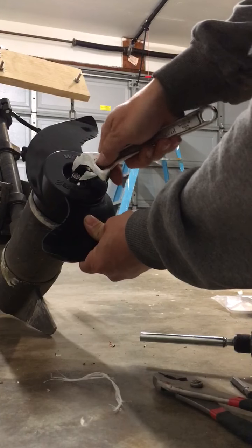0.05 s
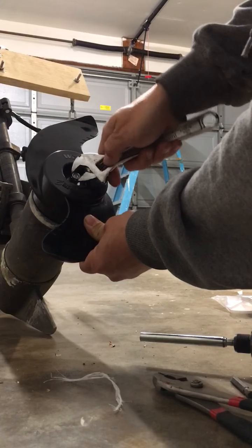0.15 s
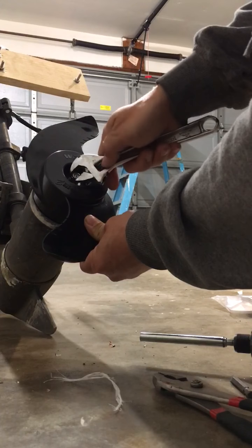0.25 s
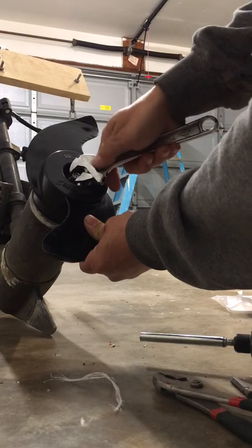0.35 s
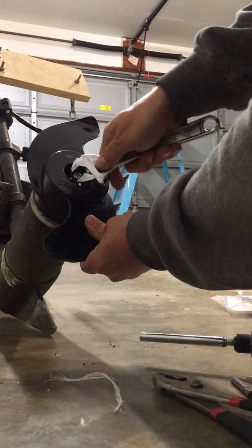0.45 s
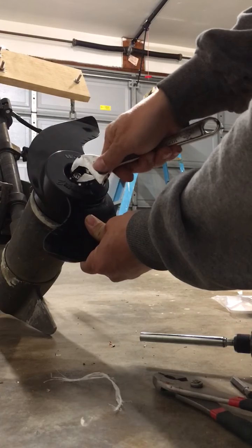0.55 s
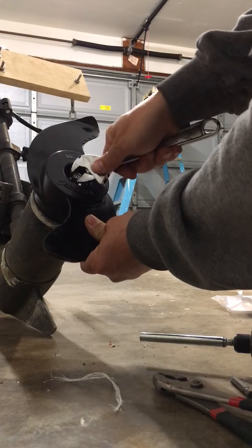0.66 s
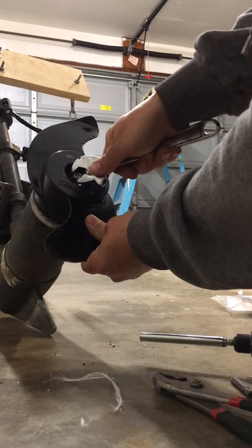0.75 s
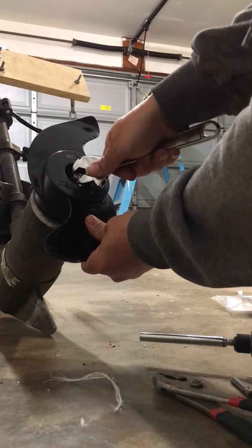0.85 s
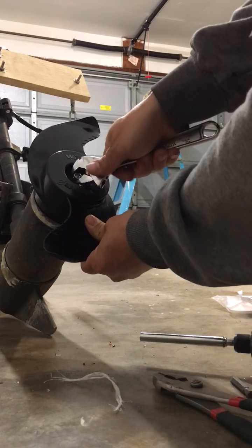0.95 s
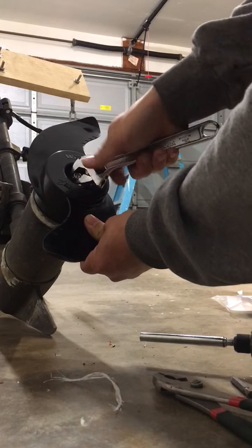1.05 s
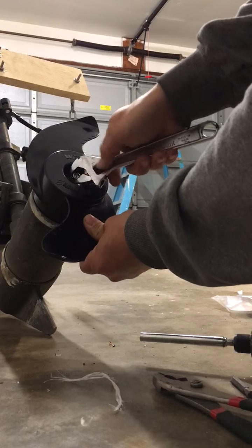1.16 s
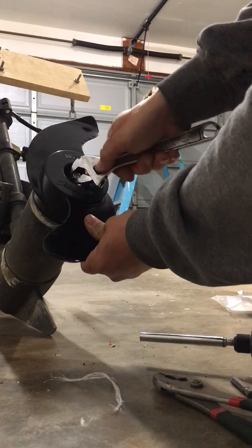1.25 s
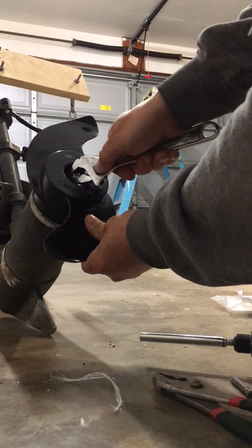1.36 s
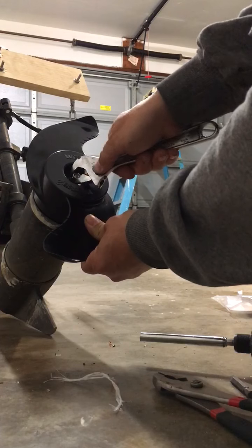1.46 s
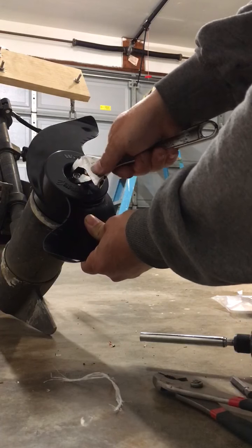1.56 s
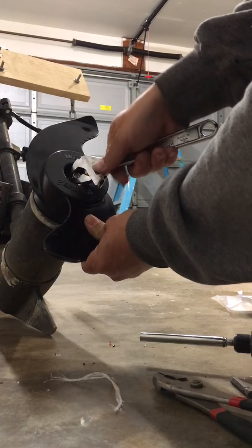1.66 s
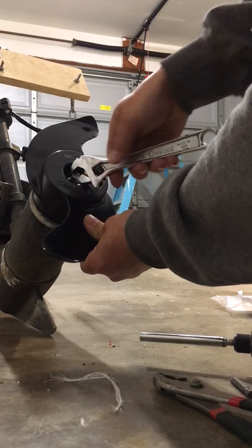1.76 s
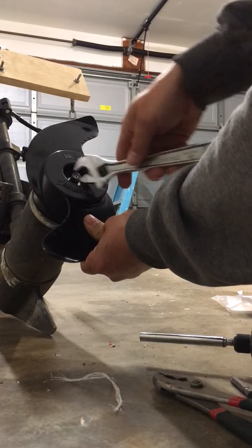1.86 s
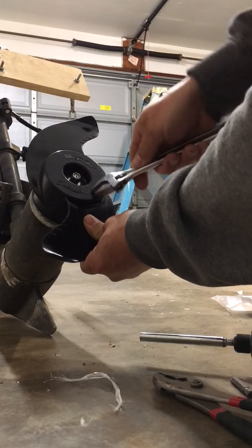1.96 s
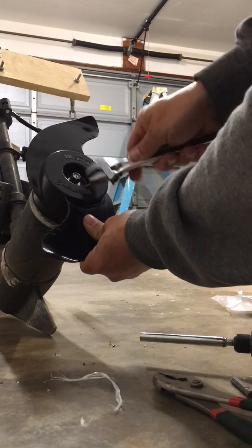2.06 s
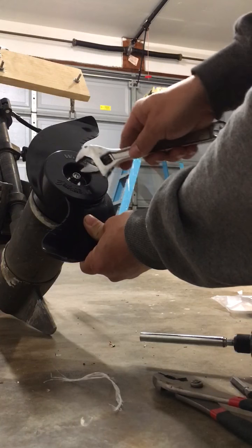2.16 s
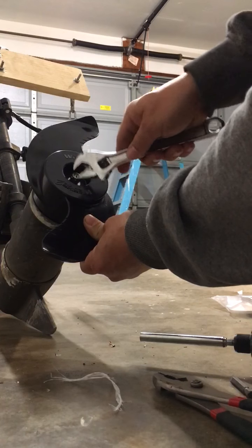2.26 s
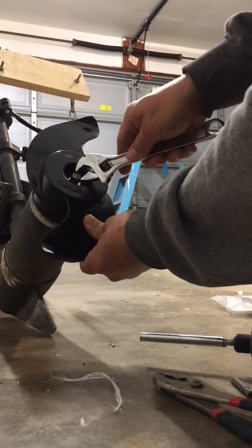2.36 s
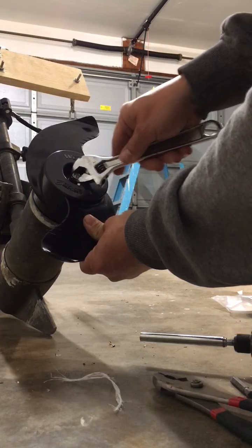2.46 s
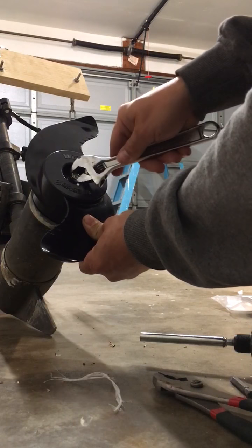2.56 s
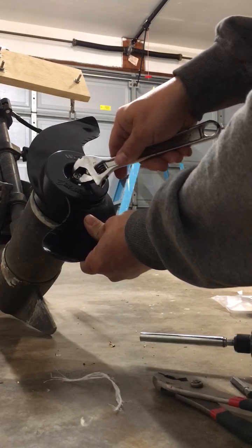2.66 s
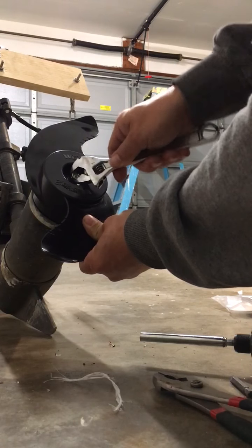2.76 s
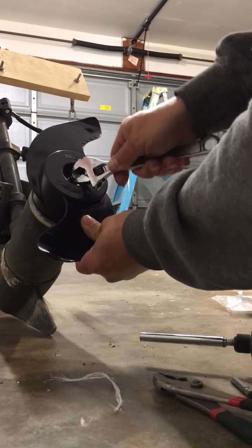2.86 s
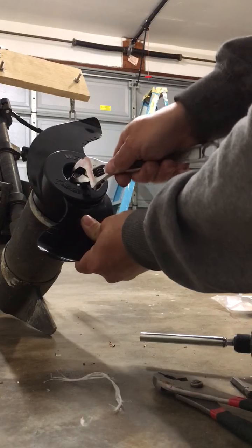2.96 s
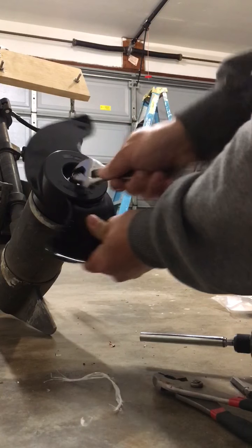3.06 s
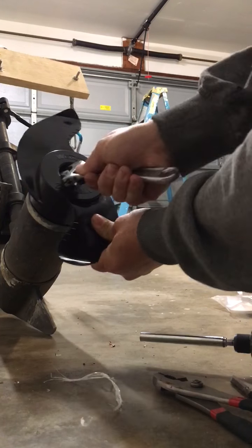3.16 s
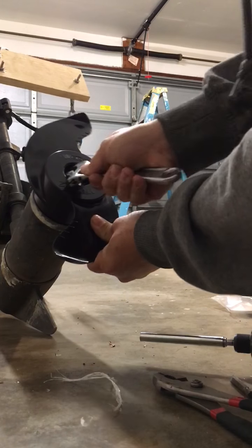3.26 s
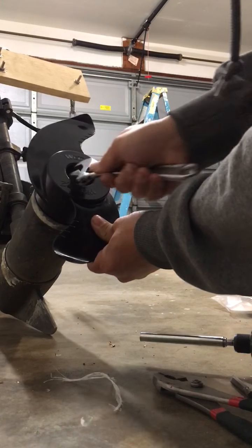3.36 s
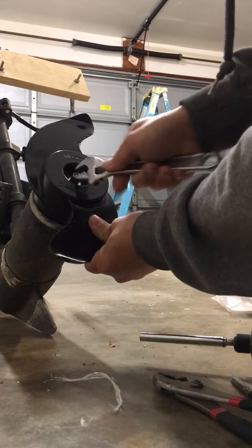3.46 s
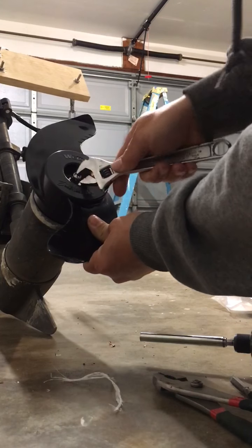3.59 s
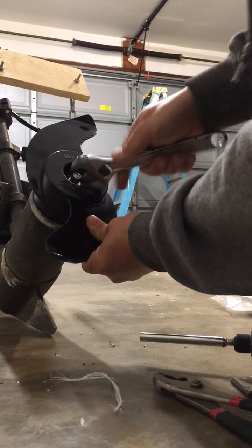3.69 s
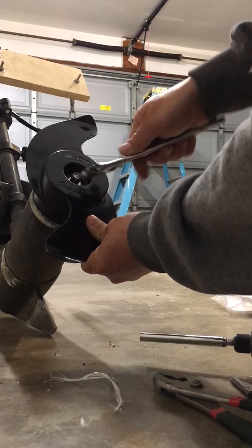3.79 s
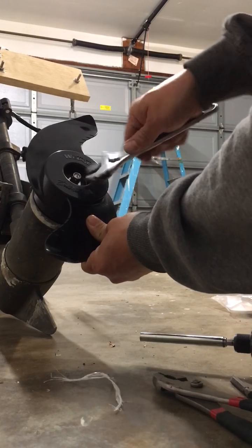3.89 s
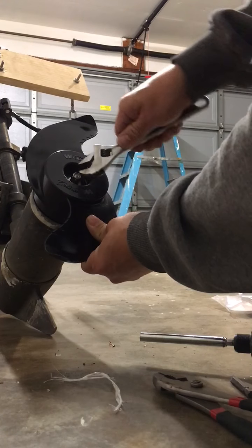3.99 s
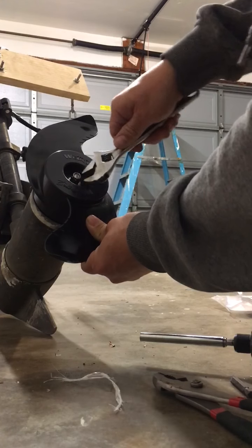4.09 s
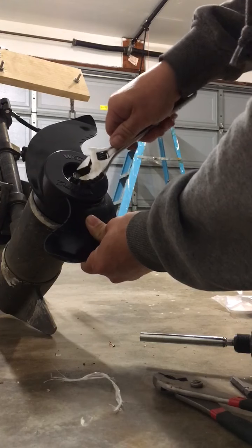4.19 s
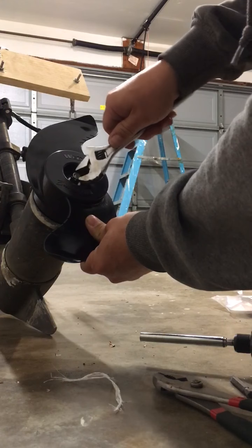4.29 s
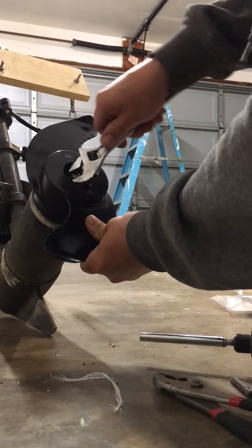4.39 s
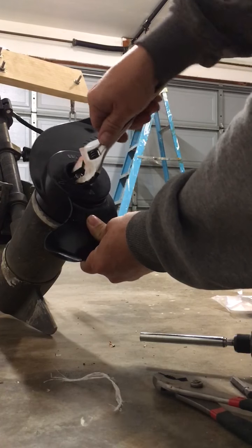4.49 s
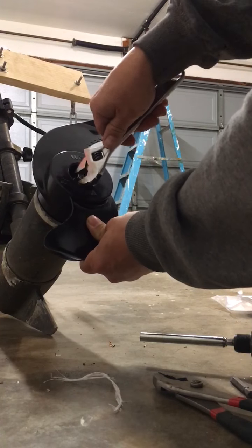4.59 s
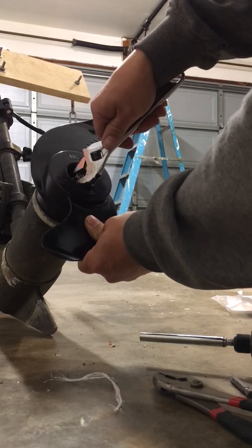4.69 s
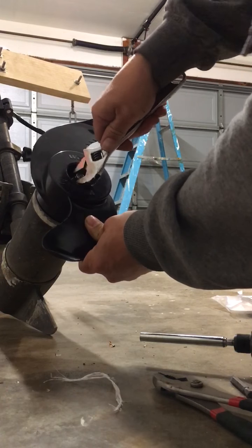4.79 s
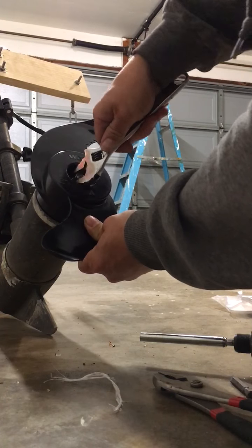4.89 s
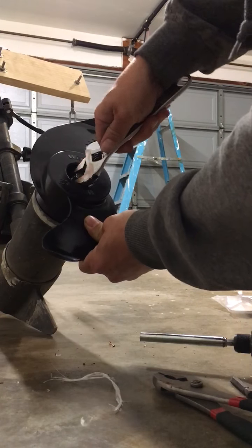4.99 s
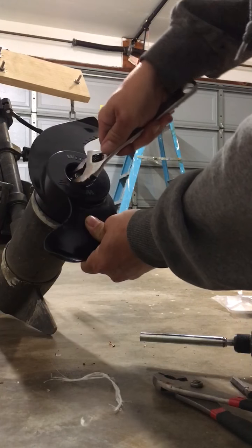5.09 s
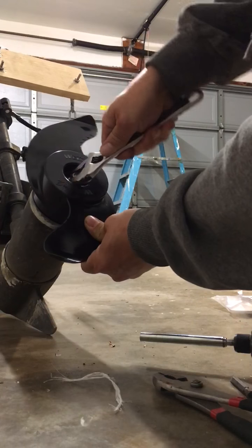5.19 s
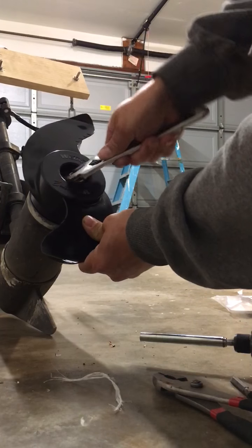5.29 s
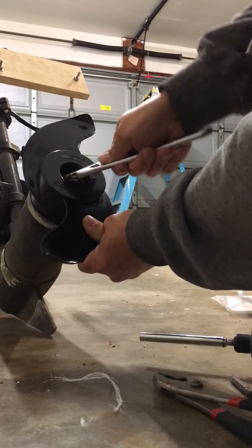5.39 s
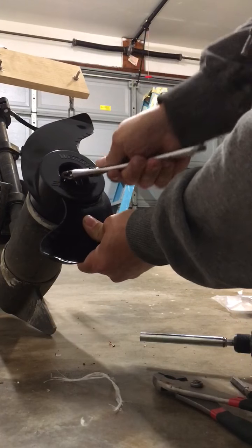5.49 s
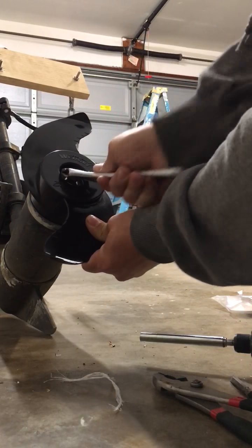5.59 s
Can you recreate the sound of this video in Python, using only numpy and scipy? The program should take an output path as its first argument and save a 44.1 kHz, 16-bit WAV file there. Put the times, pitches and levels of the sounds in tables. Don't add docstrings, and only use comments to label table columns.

```python
import sys
import numpy as np
from scipy import signal
from scipy.fft import rfft, irfft, next_fast_len
from scipy.io import wavfile
from scipy.ndimage import uniform_filter1d

SR = 44100
rng = np.random.default_rng(int(sys.argv[2]) if len(sys.argv) > 2 else 0)


def gain_from_decibels(decibels):
    exponent = np.asarray(decibels, float) / 20
    return 10 ** exponent


def bounce(signal):
    frames = np.transpose(np.atleast_2d(signal))
    limited = np.clip(frames, -1, 1)
    pcm = np.round(limited * 32767).astype(np.int16)
    wavfile.write(sys.argv[1], SR, pcm)


N = 248677


def evened(x):
    return x / np.sqrt(np.mean(x ** 2) + 1e-20)


def read(points, hz):
    f, value = np.transpose(points)
    return np.interp(np.log(hz + 1), np.log(f + 1), value)


def add(mix, s, sound):
    part = mix[round(s * SR):][:len(sound)]
    part += sound[:len(part)]


def coloured(x, points):
    size = next_fast_len(len(x))
    gain = gain_from_decibels(read(points, np.fft.rfftfreq(size, 1 / SR)))
    return irfft(rfft(x, size) * gain, size)[:len(x)]


def resonate(x, hz, width):
    r = np.exp(-np.pi * width / SR)
    pole = r * np.exp(2j * np.pi * hz / SR)
    return 2 * signal.lfilter([1 - r], [1, -pole], x).real


def resonances(push, modes):
    return evened(sum(gain_from_decibels(db) * evened(resonate(resonate(push, hz, width), hz, width))
                      for hz, width, db in modes))


def contact(chance, ms):
    u = np.arange(len(chance)) / SR / (ms / 1000)
    return chance * np.minimum(u * 8, 1) * np.exp(-u ** 2.1)


def struck(force, db, modes):
    t = np.arange(round(max(m[2] for m in modes) * SR)) / SR
    body = np.zeros(len(t))
    for hz, level, t60 in modes:
        build_up = 1 - np.exp(-2.5 * hz * t)
        body += gain_from_decibels(level - 60 * t / t60) * np.sin(2 * np.pi * hz * t) * build_up
    sound = signal.fftconvolve(force, body)
    return gain_from_decibels(db) * sound / abs(sound).max()


def hum():
    # frequency in Hz, level in dB per Hz.
    air_spectrum = [(30, -26.5), (60, -9.5), (100, -6), (200, -11), (320, -17.5), (600, -23), (1250, -31.5),
                    (1800, -45), (3500, -41.5), (4900, -49), (6000, -48.5), (10500, -59.5), (12000, -54.5),
                    (16000, -59.5)]
    # frequency in Hz, level in dB rms, waver in dB.
    motor_lines = [(57.8, -48, 0.1), (120, -46, -0.46), (240, -56, 1.5)]
    # frequency in Hz, width in Hz, level in dB.
    air_modes = [(172.3, 11, -59), (397.3, 22, -60.5), (562, 25, -67.5), (692, 22, -64.5), (980, 190, -67),
                 (1487, 61, -70), (2222, 390, -75)]
    t = np.arange(N) / SR
    out = gain_from_decibels(-54) * evened(coloured(rng.standard_normal(N), air_spectrum))
    for hz, db, waver_db in motor_lines:
        drift = evened(resonate(rng.standard_normal(N), 0, 3.2))
        phase = 2 * np.pi * (hz * t + rng.random()) + .06 * drift
        out += np.sqrt(2) * gain_from_decibels(db + waver_db * drift) * np.sin(phase)
    for hz, width, db in air_modes:
        out += gain_from_decibels(db) * evened(resonate(rng.standard_normal(N), hz, width))
    return out


def garage(blows, held):
    # frequency in Hz, t60 in seconds.
    room_decay = [(250, .5), (700, 0.66), (1700, 0.91), (4600, 0.79), (11000, 0.51), (16000, 0.48)]
    # frequency in Hz, level in dB.
    tail_spectrum = [(250, -12), (800, -9), (2000, -7.5), (5000, -12.5), (9000, -14), (14000, -19.5)]
    hz, t, z = signal.stft(rng.standard_normal((3, SR)), SR, nperseg=256)
    decay = gain_from_decibels(-60 * t / read(room_decay, hz)[:, None])
    tails = signal.istft(z * decay, SR, nperseg=256)[1]
    age = np.arange(tails.shape[1]) / SR
    tails *= np.clip(age / 0.0014, 0, 1)
    tails *= gain_from_decibels(2.5 * np.exp(-age / .025))

    def turns(rate):
        cycle = np.arange(N) / SR * rate + np.arange(3)[:, None] / 3
        return np.cos(np.pi * cycle) * np.sqrt(2 / 3)

    sent = blows * turns(310) + held * turns(7)
    wet = signal.fftconvolve(sent, tails / np.linalg.norm(tails[0]), axes=1)[:, :N].sum(0)
    return coloured(wet, tail_spectrum)


def shake():
    # peak time in seconds, level in dB, t60 in seconds.
    jolts = [(1.122, -45, 0.21), (1.17, -52.5, .6), (2.026, -34.5, .7), (2.292, -38, 0.72),
             (2.394, -33.5, 0.44), (2.63, -55.5, 0.39), (3.165, -36, .4), (3.222, -31, 0.24),
             (3.305, -38, 1.5), (3.612, -47, 0.13), (3.768, -47.5, 0.16), (4.22, -41.5, 0.604),
             (4.316, -41, 0.32), (4.464, -72, 0.17), (4.52, -49, 1.43)]
    # frequency in Hz, width in Hz, level in dB.
    tube_modes = [(80.5, 140, -0.5), (135.2, 32, -2.5), (203.5, 37, -6.5), (279.7, 20, -13.5)]
    rise_s = 0.033
    push, t = rng.standard_normal(N), np.arange(N) / SR
    sway = np.zeros(N)
    for s, db, t60 in jolts:
        rise = np.clip(1 + (t - s) / rise_s, 0, 1)
        sway += gain_from_decibels(db - 60 * np.clip(t - s, 0, 2) / t60) * rise
    return sway * resonances(push, tube_modes)


def thuds():
    # start in seconds, level in dB, pitch in Hz, t60 in seconds.
    rocks = [
        (2.04, -45, 85, .25),
        (3.195, -38, 72, .15),
        (3.245, -35, 85, .12),
        (3.335, -37, 80, .15),
    ]
    out = np.zeros(N)
    for s, db, hz, t60 in rocks:
        add(out, s, struck(contact(np.ones(1024), 5), db, [(hz, 0, t60)]))
    return out


def scrape():
    # start in seconds, length in seconds, first level in dB,
    # last level in dB, hub over steel in dB.
    strokes = [(0, 0.13, -72.5, -78, 8), (1.802, 0.075, -67.5, -75, 9), (3.041, 0.12, -77.5, -55, 3),
               (3.151, 0.029, -56, -58, 4), (3.173, 0.015, -55.5, -39, 3), (3.183, 0.022, -37.5, -32, -6),
               (3.96, 0.063, -70, -71, -1), (4.07, 0.079, -72, -82.5, 3), (4.232, .06, -62, -59, 6),
               (2.288, .045, -60, -66, 4), (4.358, 0.076, -65, -67, 8.5), (4.431, 0.061, -69, -57.5, 11)]
    glides = [
        (1.9, 0.07, -81, -62.5, 12.4),
        (4.51, 0.19, -60, -82, 4),
        (5.28, 0.196, -77.5, -74, 8.2),
        (5.47, 0.21, -71, -70, 6.8),
    ]
    # frequency in Hz, width in Hz, level in dB.
    rubbed_parts = [
        [(3650, 1000, -3), (2500, 1500, -5)],
        [(5870, 1200, 6), (6360, 950, 0)],
        [(9440, 900, -3), (11600, 1500, -2.5), (8000, 5000, 0), (14500, 5000, -5.5)],
        [(840, 510, 3), (1580, 140, -2)],
    ]
    handle_db, edge_s = -7, 0.007
    out, press = np.zeros(N), np.zeros((4, N))
    for rows, nut_db in ((strokes, -3), (glides, 0)):
        for s, length, first_db, last_db, hub_db in rows:
            t = np.arange(0, length, 1 / SR)
            edges = np.clip(np.minimum(t, length - t) / edge_s, 0, 1)
            stroke = gain_from_decibels(first_db + (last_db - first_db) * t / length) * edges
            for part, db in zip(press, (0, nut_db, handle_db, hub_db)):
                add(part, s, gain_from_decibels(db) * stroke)
    grip = evened(uniform_filter1d(rng.standard_normal(N), size=260))
    for gain, modes in zip(press, rubbed_parts):
        unevenness_db = 2.5 * rng.standard_normal(N) + 2.5 * grip
        slips = rng.standard_normal(N) * gain_from_decibels(unevenness_db)
        out += gain * resonances(slips, modes)
    return out


def shaft():
    # frequency in Hz, level in dB, share of the t60.
    close_modes = [(1434, -6, .9), (1472, -3, 1.1), (1533, -2, 1.0), (1551, -6, 1.1), (1577, 0, 1.0),
                   (1645, -8, 0.8)]
    # start in seconds, level in dB, t60 in seconds.
    shaft_blows = [
        (2.3683, -28, 0.2),
        (2.4222, -35, 0.22),
        (3.2069, -25, .6),
        (3.2199, -29, 0.9),
        (4.295, -42, 0.1),
    ]
    out, chance = np.zeros(N), rng.standard_normal((len(shaft_blows), 128))
    for (s, db, t60), c in zip(shaft_blows, chance):
        modes = [(hz, level + 2.5 * k, t60 * share)
                 for (hz, level, share), k in zip(close_modes, c[::-1])]
        add(out, s, struck(contact(c, 0.39), db, modes))
    return out


def rings():
    # frequency in Hz, t60 in seconds.
    handle_modes = [(3311, 0.096), (5884, .3), (8950, 0.42), (11860, 0.3)]
    # start in seconds, then the levels in dB of its four modes from low to high.
    pings = [(.1037, -72, -82, -89, -74), (0.4207, -58, -61, -61.5, -68), (.6838, -69, -73, -92, -66),
             (.7886, -79, -90, -88, -70), (1.6034, -68.5, -72, -82, -87), (1.813, -64.5, -67, -77, -87),
             (2.831, -52.5, -58, -55, -53), (3.0355, -62, -68, -73.5, -74.5), (3.228, -52, -52, -55, -53),
             (3.411, -58.5, -60, -60, -68.5), (3.489, -52, -56, -73.5, -55), (3.5365, -67, -79, -79, -52.5),
             (3.9413, -55, -56, -58, -57), (4.3094, -52, -55, -74, -59), (4.722, -68, -76.5, -73, -72),
             (5.1103, -72, -89.5, -86.5, -72)]
    # start in seconds, level in dB, pitch
    # in Hz, t60 in seconds; the clear notes below have the same columns.
    ringing_parts = [(.001, -60, 5600, 0.31), (4.297, -44, 5550, 0.32), (0.853, -50, 810, .12),
                     (1.3119, -50, 2590, 0.025), (1.3151, -50, 1340, 0.13), (1.8131, -72.5, 11400, 0.092),
                     (2.0125, -15, 15800, .008), (2.0132, -24, 8510, .009), (2.3348, -20.5, 11500, .006),
                     (2.3685, -30, 15500, .008), (2.4205, -32, 15100, .005), (2.015, -28, 6050, 0.3),
                     (2.37, -27.5, 8420, .08), (2.3695, -28, 11600, .012), (2.371, -32, 5630, .1),
                     (2.352, -36, 5650, .04), (2.4245, -26, 8500, .015), (2.4248, -32, 9500, .01),
                     (2.43, -43, 5580, .5), (2.4242, -39, 5860, 0.58), (2.427, -40, 8500, 0.4),
                     (3.215, -41, 1950, 0.7), (3.23, -44, 2600, .8), (3.394, -56, 6400, .02),
                     (3.853, -45, 3795, 0.033), (5.56, -60, 3350, 0.21), (0.3143, -52, 4600, 0.0091),
                     (1.31, -53, 4600, .01), (3.228, -45, 11880, 0.37), (3.4885, -50.5, 8000, .01),
                     (3.528, -58, 14000, .006), (3.6007, -14.5, 14700, .01), (3.6009, -24, 9800, .012),
                     (3.6036, -27, 9800, .02), (3.601, -22, 12200, .006), (3.6042, -14.5, 12180, .005),
                     (3.6042, -20.5, 14500, .006), (3.61, -37, 6020, 0.4), (3.7922, -24.5, 6160, 0.035),
                     (3.791, -34, 5530, .12), (3.8256, -39, 14900, .012), (4.2823, -58, 11500, .03),
                     (4.2971, -39, 8360, 0.19), (4.2955, -36, 15440, .006), (5.5201, -52, 7450, .04),
                     (1.943, -47, 5720, .08), (3.222, -36, 815, .6), (4.2232, -32, 5500, .02),
                     (4.236, -46, 1950, .15), (4.232, -40, 830, .2),
                     (2.831, -58, 12800, .2),
        (2.832, -62, 8400, .2),
        (3.0355, -60, 5500, .03),
        (2.938, -64, 3350, .04),
        (4.5012, -27, 11500, .008),
        (4.5012, -32, 7200, .008),
        (3.232, -52, 7200, .3),
        (4.235, -44, 1540, .3),
    ]
    clear_notes = [
        (2.0145, -24, 3690, .05),
        (2.033, -32, 3690, .1),
        (3.6036, -20, 2050, .04),
        (3.6045, -22, 3720, .04),
        (3.612, -37, 3700, .5),
        (3.62, -43, 2000, .4),
        (3.411, -48, 5620, .25),
        (4.309, -33.5, 1555, .4),
    ]
    strikes = []
    for s, *levels in pings:
        strikes += [(s, db, *mode, .004) for db, mode in zip(levels, handle_modes)]
    strikes += [(*ring, .02) for ring in ringing_parts]
    strikes += [(*note, .008) for note in clear_notes]
    out, chance = np.zeros(N), rng.standard_normal((len(strikes), 128))
    for (s, db, hz, t60, spread), c in zip(strikes, chance):
        cluster = [(hz * (1 + spread * k), -3.0 * abs(k), t60) for k in (0, *c[-5:])]
        add(out, s, struck(contact(c, 0.4), db, cluster))
    return out


def knocks():
    # start in seconds, level in dB, pitch in Hz.
    hub_knocks = [(.315, -39, 930), (1.31, -45, 680), (1.947, -42, 680), (1.984, -28, 936),
                  (2.011, -20.5, 1090), (2.012, -15, 812), (2.031, -20, 820), (2.284, -18, 810),
                  (2.335, -33, 950), (2.368, -22, 840), (2.416, -29.5, 827), (2.419, -20.5, 850),
                  (3.129, -38.5, 653), (3.152, -35, 795), (3.179, -39, 1060), (3.188, -22.5, 1120),
                  (3.197, -22.5, 872), (3.207, -13, 820), (3.221, -31, 820), (3.599, -28, 800),
                  (3.604, -22, 786), (3.788, -38.5, 850), (4.193, -31, 760), (4.221, -31.5, 924),
                  (4.231, -36, 840), (4.282, -33, 900), (4.293, -28, 816), (4.417, -48, 810),
                  (4.501, -25, 858), (4.738, -28, 865), (1.9885, -33, 900), (2.037, -26, 900),
                  (2.2965, -31, 930), (2.3405, -36, 950), (4.1955, -35, 800)]
    # start in seconds, level in dB, pitch in Hz.
    blade_knocks = [(.315, -48.5, 1520), (1.312, -49.5, 1580), (1.947, -48, 1480), (1.984, -34.5, 2050),
                    (2.011, -26, 1290), (2.012, -30, 2050), (2.284, -31.5, 1380), (2.335, -34, 2050),
                    (2.368, -19.5, 2326), (2.419, -26, 1364), (3.151, -47, 1550), (3.179, -31.5, 1320),
                    (3.188, -46, 2100), (3.197, -33, 2040), (3.207, -8.5, 1520), (3.22, -32, 1590),
                    (3.411, -38, 1580), (3.601, -25.5, 2050), (3.604, -26.5, 1900), (3.789, -30.5, 2335),
                    (3.853, -40.5, 2250), (4.043, -44.5, 2270), (4.221, -39, 2410), (4.233, -46, 1950),
                    (4.284, -44, 1380), (4.2925, -25, 1520), (4.294, -31.5, 2410), (4.418, -43.5, 2690),
                    (4.738, -47, 2400), (4.861, -49, 694), (3.7905, -40, 1530), (4.222, -38, 1600),
                    (5.102, -58, 2700)]
    contact_ms, hub_t60, blade_t60 = 0.2, 0.03, 0.021
    out = np.zeros(N)
    for (s, db, hz), c in zip(hub_knocks, rng.standard_normal((len(hub_knocks), 512))):
        modes = [(hz, 0, hub_t60), (0.83 * hz, -7, hub_t60 / 2)]
        add(out, s, struck(contact(1 + .6 * c, contact_ms), db, modes))
    for (s, db, hz), c in zip(blade_knocks, rng.standard_normal((len(blade_knocks), 512))):
        modes = [(hz, 0, blade_t60), (.84 * hz, -13, blade_t60)]
        add(out, s, struck(contact(1 + .6 * c, contact_ms), db + 2.5, modes))
    return out


def contacts():
    # start in seconds, crack in dB, jaw in dB, jaw pitch in Hz, nut in dB.
    hard_blows = [(1.9845, -52, -50, 2600, -55), (1.9882, -52, -38, 3700, -50),
                  (2.0117, -12, -31.5, 3960, -28), (2.013, -14, -29.5, 3570, -33),
                  (2.0152, -21, -40, 3900, -25), (2.0322, -28.5, -33.5, 3810, -31.5),
                  (2.2838, -39, -46, 3700, -42), (2.335, -20, -34, 3600, -40),
                  (2.3385, -30, -37, 3300, -38), (2.352, -33, -36, 4200, -36),
                  (2.369, -18, -22.5, 4260, -15.5), (2.3709, -22, -26, 3570, -26.5),
                  (2.375, -27, -30.5, 3620, -30), (2.421, -23, -37, 3700, -30),
                  (2.4247, -25, -41, 3770, -39.5), (3.1859, -45, -28, 3800, -37),
                  (3.1892, -37, -20, 3680, -31), (3.1955, -33, -19, 3720, -21),
                  (3.1979, -35, -19, 3600, -37), (3.2019, -29, -17.5, 3520, -25.5),
                  (3.2067, -32, -18, 3330, -27), (3.4103, -52, -39, 3550, -31),
                  (3.6011, -26.5, -24, 3780, -31.5), (3.6039, -22.5, -16.5, 3650, -43),
                  (3.7887, -23, -28, 3750, -26.5), (4.2213, -42, -40, 3600, -42),
                  (4.2232, -30.5, -33, 3450, -34), (4.2931, -30, -29.5, 3890, -29),
                  (4.2949, -23, -31, 3650, -27), (4.2973, -37, -51, 3650, -36),
                  (4.5011, -25.5, -32, 3680, -28), (4.7378, -56.5, -46.5, 3450, -54)]
    # start in seconds, crack in dB, jaw in dB, nut in dB.
    light_touches = [(0.3144, -54, -46.5, -51), (.7734, -65, -55, -65), (1.0979, -56, -62, -69),
                     (1.3111, -46.5, -54, -50), (1.6034, -67, -65.5, -69), (1.736, -58.5, -56.5, -70),
                     (1.78, -63.5, -63, -67), (1.8128, -64.5, -56, -57), (1.846, -62, -59.5, -67),
                     (1.921, -63, -66, -60), (1.9478, -62, -52, -56), (2.83, -46, -62, -67),
                     (3.0353, -62, -57, -60), (3.144, -60, -46, -58), (3.1503, -57, -47, -57),
                     (3.16, -57.5, -43, -55), (3.168, -52.5, -43, -41), (3.1795, -43, -32.5, -38),
                     (3.192, -38, -30.5, -37), (3.4712, -66, -54, -50), (3.488, -55, -50, -44),
                     (3.8257, -32, -62, -60), (3.8545, -52, -48, -43), (3.9408, -55, -50, -63.5),
                     (4.0424, -41.5, -47.5, -44.5), (4.417, -63, -50, -48), (4.1932, -62, -60, -62),
                     (4.8117, -65.5, -56, -71), (4.861, -66, -68, -69), (5.1844, -67, -73, -78),
                     (5.423, -70, -58.5, -65), (5.52, -57.5, -60, -69)]
    blow_ms, touch_ms = 2.61, 1.5
    rows = [(*blow, blow_ms) for blow in hard_blows]
    for s, crack_db, jaw_db, nut_db in light_touches:
        jaw_hz = 3580 * (1 + 0.052 * rng.standard_normal())
        rows.append((s, crack_db, jaw_db, jaw_hz, nut_db, touch_ms))
    return rows


def clinks():
    # frequency in Hz, level in dB per Hz.
    crack_spectrum = [(600, -18.5), (1500, -2), (3000, -10), (4700, -6.5), (7200, -4.5), (8500, 1),
                      (10400, -5.5), (12000, 1), (15200, -10.5), (16600, -8.5), (18000, -16)]
    # frequency in Hz, level in dB, t60 in seconds.
    nut_modes = [(5600, 5.5, 0.0098), (6150, 0.5, 0.014)]
    crack_share, jaw_t60 = .5, 0.021
    lead = 32
    rows = contacts()
    snap = coloured(np.eye(1, 256, 128)[0], crack_spectrum)
    snap /= np.linalg.norm(snap)
    cracks, spread, notes = np.zeros((3, N))
    chance = rng.standard_normal((len(rows), 2, 768))
    for (s, crack_db, jaw_db, jaw_hz, nut_db, ms), (c, d) in zip(rows, chance):
        micro_impacts = c * gain_from_decibels(3.0 * d)
        bins = rfft(contact(micro_impacts, crack_share * ms))
        even = contact(irfft(bins / abs(bins)), 1.5 * ms)
        crack = coloured(np.roll(even, lead), crack_spectrum)
        strength = gain_from_decibels(crack_db - 7) * np.sqrt(ms * SR / 1000)
        add(cracks, s - lead / SR, strength * crack / np.linalg.norm(crack))
        add(spread, s, strength * snap)
        jaw_modes = [(jaw_hz, 0, jaw_t60), (.92 * jaw_hz, -15, jaw_t60)]
        add(notes, s, struck(contact(c, ms / 4), jaw_db + 3.0, jaw_modes))
        add(notes, s, struck(contact(d, ms / 4), nut_db + 2.5, nut_modes))
    return cracks, spread, notes


def scene():
    plastic = knocks()
    cracks, spread, notes = clinks()
    free = rings() + shaft()
    rub = scrape()
    blows = gain_from_decibels(1.5) * spread + gain_from_decibels(-7.5) * plastic + gain_from_decibels(-7.5) * notes
    held = gain_from_decibels(-4.5) * plastic + gain_from_decibels(-11.5) * notes + gain_from_decibels(-2.5) * free + rub
    direct = plastic + cracks + notes + free + rub
    return (direct + garage(blows, held) + shake() + thuds() + hum())[None]


def top_cut(x):
    return signal.sosfilt(signal.butter(12, 19760, fs=SR, output="sos"), x)


def record(dry):
    # frequency in Hz, level in dB.
    mic_response = [(20, -20), (40, -11), (52, 0), (16800, 0), (17200, -14), (18500, -17.5), (20000, -21.5)]
    return top_cut(coloured(dry[0], mic_response)[None])


dry = scene()
out = record(dry)
bounce(out)
```